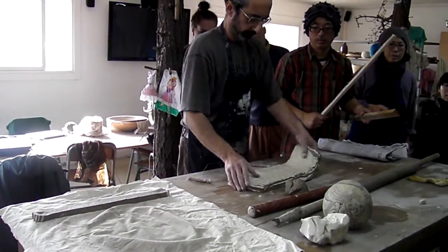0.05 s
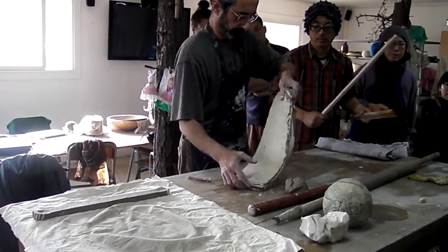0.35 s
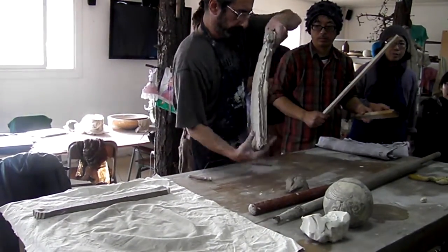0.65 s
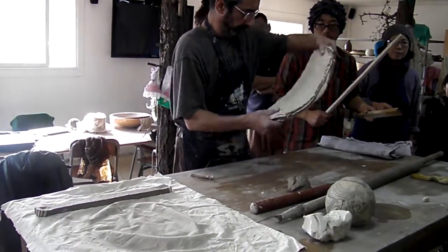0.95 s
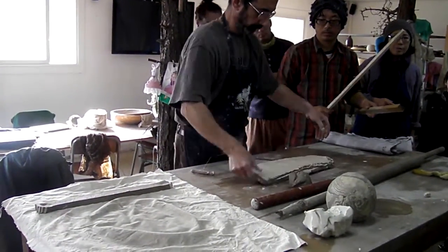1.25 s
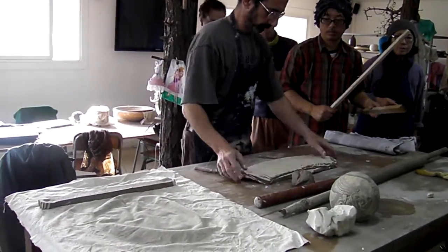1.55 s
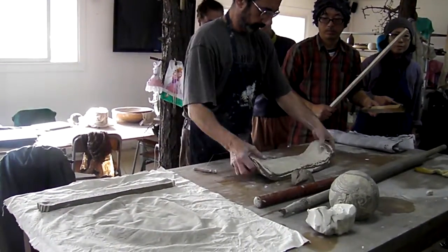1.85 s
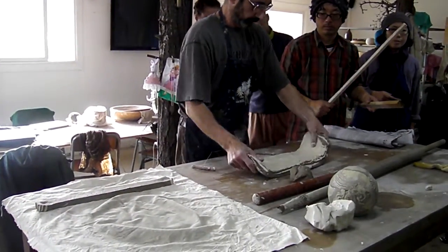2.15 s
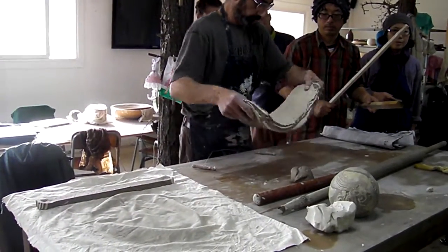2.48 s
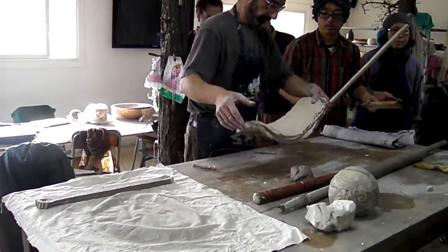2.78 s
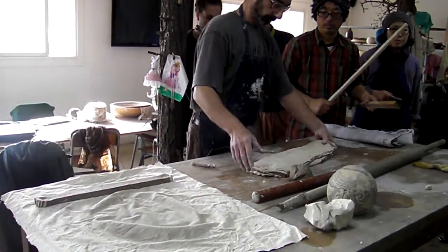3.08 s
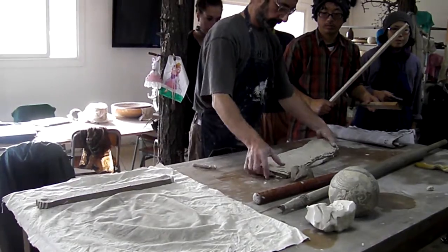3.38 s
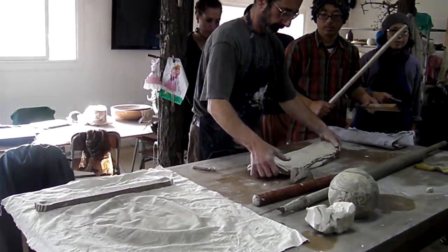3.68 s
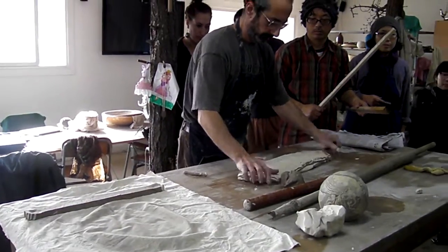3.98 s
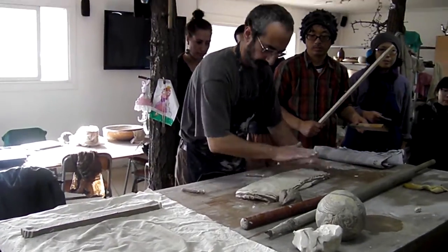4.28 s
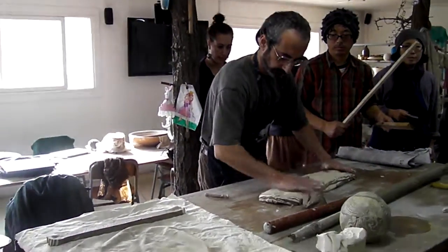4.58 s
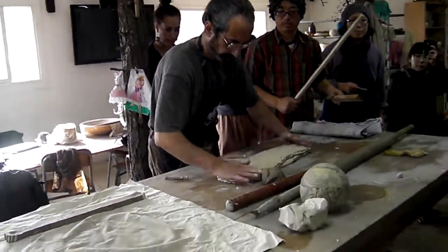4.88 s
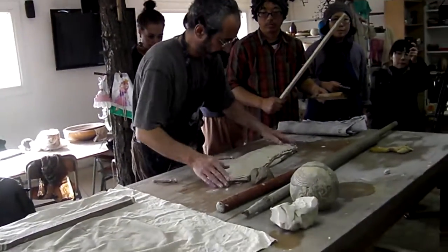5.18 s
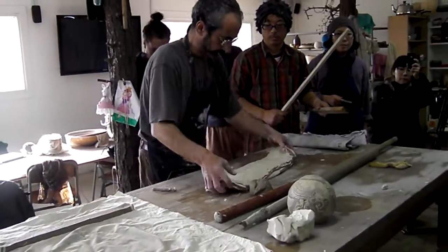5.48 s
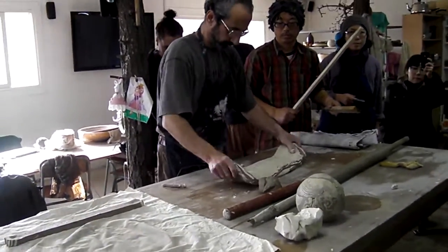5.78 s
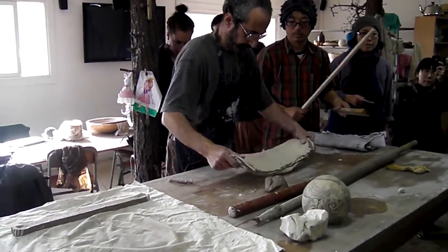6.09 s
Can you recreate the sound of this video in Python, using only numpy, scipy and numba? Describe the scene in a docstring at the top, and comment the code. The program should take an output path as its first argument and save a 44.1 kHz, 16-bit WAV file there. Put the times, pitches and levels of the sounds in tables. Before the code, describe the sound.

A slab of wet clay is peeled off a wooden table and flops back down with a double thud. After a sticky smack it lands again, heavier. Cupped hands pat and drag it, then slap it four times in quick succession, each crack ringing briefly in the bare studio. Small ticks, rubs and another wet smack follow. The microphone is fairly near, with steady faint room hiss underneath.

```python
"""Slapping clay on a worktable

A potter flops a slab of wet clay onto a wooden table, grips it and slaps it flat with both hands.
Each impact excites the table top's damped modes (a thud) and squeezes out air (a crack); a bare studio
reverberates. Friction, small ticks and a faint whine lie between the blows. The camera's limiter
holds the loud slaps down, so the room swells up behind them as the gain recovers."""
import sys
import numpy as np
from scipy import signal
from scipy.fft import rfft, irfft
from scipy.io import wavfile
from scipy.ndimage import uniform_filter1d
from numba import njit

SR = 44100
rng = np.random.default_rng(int(sys.argv[2]) if len(sys.argv) > 2 else 0)


def log_audio(samples):
    """Write samples as a 16-bit WAV file to the path given in sys.argv[1]."""
    # one column per channel
    frames = np.atleast_2d(samples).T
    # limit to full scale, then quantise
    limited = np.clip(frames, -1, 1)
    pcm = np.round(limited * 32767).astype(np.int16)
    wavfile.write(sys.argv[1], SR, pcm)


N = 275184
PULSE_SAMPLES = 4096

# Levels in the tables are relative.
# room air and microphone hiss: (frequency [Hz], spectral density [dB])
AIR_SPECTRUM = [(18, -76), (30, -49), (109, -20), (124, -13), (384, -5.5), (415, 1), (449, -6.5), (649, -8),
                (721, -10.5), (1670, -14.5), (2290, -17.5), (4300, -19.5), (6050, -21), (14000, -26),
                (16000, -28.5)]
# bands of the whine: (centre [Hz], bandwidth [Hz], level [dB])
WHINE_BANDS = [(1210, 260, 2), (2320, 140, 1), (3220, 200, -8), (4960, 550, -14)]
# swells of the whine: (time [s], level [dB], hold [s])
WHINE_SWELLS = [(1.75, -55, .01), (3.635, -48, 0.011), (4.26, -46, 0.11)]
# the studio's diffuse field: (frequency [Hz], reverberation time T60 [s], tail level [dB])
REVERBERATION = [(139, 0.51, 4.5), (270, 0.94, 8.5), (387, 0.51, 11.5), (724, 0.53, 5.5), (1340, 0.5, 2.5),
                 (2920, 0.53, -2.5), (7340, 0.42, -2.5), (14000, 0.4, -9)]
# reflections from table, body, ceiling and walls: (delay [s], gain [ratio])
REFLECTIONS = [(.0031, 0.16), (.0062, 0.22), (.0088, 0.49), (0.011, 0.15), (0.011, 0.1), (0.0208, 0.22)]
# resonances of the loaded table top: (frequency [Hz], bandwidth [Hz], gain [dB])
TABLE_MODES = [(194, 10, -2.5), (266, 20, 1.5), (345, 41, -0.5), (446, 9.7, 1), (640, 1100, -1.5)]
# the table top's weak radiation in the bass: (frequency [Hz], gain [dB])
BASS_RADIATION = [(30, -31.5), (70, -31.5), (110, -29.5), (160, -22.5), (210, -14), (270, -8)]
# clay and hands drag on the table: (peak time [s], level [dB], rise [s], fall [s])
DRAG_STROKES = [(0.492, -48.5, 0.35, .09), (2.065, -44.5, 0.048, 0.12), (3.86, -34, 0.03, 0.051),
                (4.07, -46, 0.025, 0.12), (5.305, -37.5, 0.041, 0.11), (6.0, -42.5, 0.14, 0.44)]
# small ticks: (time [s], level [dB], brightness [dB], spot resonance [Hz], spatter decay [s],
# resonance height [dB])
SMALL_TICKS = [(1.72, -1.5, 4, 2480, .003, 9), (3.324, -3.5, -5, 2390, 0.0035, 26),
               (4.036, 9.5, 8.5, 1930, .06, 3.5), (4.068, 16, -17, 1570, 0.0014, 16),
               (4.3429, -16.5, 21.5, 7560, 0.00055, 16), (4.44, 0, 2, 3000, 0.00069, 5),
               (5.5375, 10.5, -0.5, 3000, 0.0029, 7), (5.728, 16.5, -9.5, 4420, 0.0023, 17.5)]
# soft bumps of fingers and slab edges: (time [s], level [dB], brightness [dB], spot resonance [Hz])
LIGHT_TOUCHES = [(.051, -2, 2.5, 610), (.077, 4.5, 2, 423), (1.635, 2, -0.5, 3280), (1.685, 7, -4, 2580),
                 (1.826, 2.5, -1, 350), (3.476, 9, -3, 2300), (5.4887, 6, -2.5, 420)]
# pats of a cupped hand: (time [s], level [dB], brightness [dB], spot resonance [Hz], thud [dB])
CUPPED_PATS = [(3.6085, 29, -8.5, 762, -8.5), (3.8338, 34.5, 1.5, 795, -9), (5.746, 23, 8, 1047, 0)]
# the slab is gripped and pulled off the boards: (time [s], level [dB], brightness [dB],
# spot resonance [Hz], spatter decay [s], thud [dB])
WET_SMACKS = [(.104, 18, 1.5, 444, 0.013, -1.5), (1.992, 18.5, -6, 1300, 0.0023, -4),
              (2.124, 28.5, 6.5, 1070, 0.0048, -3.5), (4.096, 30.5, 1, 764, 0.0095, -1.5),
              (5.789, 33.5, -.5, 1350, 0.001, -8.5)]
# the slab lands, one part after another: (time [s], level [dB], brightness [dB], spot resonance [Hz],
# spatter decay [s], thud [dB], reverberation gain [dB])
SLAB_LANDINGS = [(1.234, 33, 2, 1060, 0.0051, 3.5, 8), (1.3653, 32.5, -1.5, 920, 0.0058, 0, 3.5),
                 (2.9686, 23.5, 11, 4300, 0.012, 22, -4.5), (2.979, 45, -0.5, 1440, 0.00051, 4, -5),
                 (3.024, 37, -7.5, 436, .0065, -7, 6.5), (3.077, 33, -5.5, 430, 0.0035, -4, 6.5)]
# two-handed slaps: (time [s], level [dB], brightness [dB], thud [dB], second hand's lag [s],
# first spot resonance [Hz], second spot resonance [Hz], resonance height [dB])
HAND_SLAPS = [(4.456, 26.5, 0.5, 6, 0.0037, 5800, 4300, 9), (4.6548, 32.5, 0, 0, 0.0035, 5120, 1950, 10),
              (4.826, 42, -5.5, -2, .004, 3900, 3760, 11), (4.9752, 39, -1.5, -1.5, 0.0065, 1110, 265, 5.5)]


def amp(db):
    """Amplitude ratio of a level in decibels."""
    return 10 ** (np.asarray(db) / 20)


def unit_rms(x):
    """Normalisation to unit mean power."""
    return x / np.sqrt(np.mean(x ** 2) + 1e-20)


def curve(points, hz, column=1):
    """Linear interpolation of a table column over log frequency."""
    columns = np.transpose(points)
    return np.interp(np.log(hz + 1), np.log(columns[0] + 1), columns[column])


def add(mix, time, sound):
    """Superposition of a sound onto the mix, starting at a time in seconds."""
    part = mix[round(time * SR):][:len(sound)]
    part += sound[:len(part)]


def resonance(hz, centre, width):
    """Lorentzian resonance curve, 1 at its centre."""
    return 1 / (1 + (2 * (hz - centre) / width) ** 2)


def minimum_phase(gain_db):
    """Minimum-phase response: the quickest causal pulse with this spectrum."""
    log_gain = np.log(amp(np.r_[gain_db, gain_db[-2:0:-1]]))
    log_spectrum = np.conj(signal.hilbert(log_gain))
    return irfft(np.exp(log_spectrum)[:len(gain_db)])


def swell(time, db, rise, hold, fall):
    """Exponential growth and decay around a hold; each slope spans 20 dB in its time."""
    t = np.arange(N) / SR - time
    return amp(db - 20 * np.maximum(np.maximum(-t / rise, (t - hold) / fall), 0))


def noise(spectrum):
    """Stationary Gaussian noise with the given spectrum, rms 1."""
    gain = amp(curve(spectrum, np.fft.rfftfreq(N, 1 / SR)))
    return unit_rms(irfft(rfft(rng.standard_normal(N)) * gain, N))


def room_air(level_db=-48):
    """The noise floor: steady broadband room air and microphone hiss."""
    return amp(level_db) * noise(AIR_SPECTRUM)


def whine(waver_db=2, waver_hz=18):
    """Amplitude modulation: narrow noise bands swell and fade together, each wavering on its own."""
    hz, out = np.fft.rfftfreq(N, 1 / SR), np.zeros(N)
    for centre, width, db in WHINE_BANDS:
        band = irfft(rfft(rng.standard_normal(N)) * amp(db) * resonance(hz, centre, width), N)
        waver = unit_rms(irfft(rfft(rng.standard_normal(N)) * (hz < waver_hz), N))
        out += band * amp(waver_db * waver)
    envelope = sum(swell(time, db, rise=0.08, hold=hold, fall=0.19) for time, db, hold in WHINE_SWELLS)
    return unit_rms(out) * envelope


def studio_tail(build_s=0.00075):
    """Reverberation: a diffuse field builds at once and decays exponentially, the treble first."""
    hz, t, bands = signal.stft(rng.standard_normal(SR), SR, nperseg=256)
    t60 = curve(REVERBERATION, hz)[:, None]
    tail_db = curve(REVERBERATION, hz, column=2)[:, None]
    unit_energy = np.sqrt(2 * np.log(1000) / (t60 * SR))
    bands = bands * amp(tail_db - 60 * t / t60) * unit_energy
    tail = signal.istft(bands, SR, nperseg=256)[1][:SR]
    return tail * (1 - np.exp(-np.arange(SR) / SR / build_s))


def early_paths(cutoff_hz=6000):
    """Multipath propagation: the direct sound and a few delayed, dulled reflections."""
    echoes = np.zeros(PULSE_SAMPLES)
    for delay, gain in REFLECTIONS:
        echoes[round(delay * SR)] += gain
    dulled = signal.lfilter(*signal.butter(1, cutoff_hz, fs=SR), echoes)
    return signal.unit_impulse(PULSE_SAMPLES) + dulled


def drags(grain_db=3, gain_db=-5):
    """Sliding friction: damp clay on the boards gives noise with a grainy amplitude."""
    strokes = sum(swell(time, db, rise, 0, fall) for time, db, rise, fall in DRAG_STROKES)
    grains = amp(grain_db * unit_rms(uniform_filter1d(rng.standard_normal(N), size=90)))
    hiss = noise([(80, -28), (300, -2), (1000, -5), (4000, -6), (8000, -14), (16000, -47)])
    rub = strokes * unit_rms(grains * hiss)
    return amp(gain_db) * (rub + signal.fftconvolve(rub, studio_tail())[:N])


def contact_force(decay_s, crossover_hz=1500):
    """Impulsive excitation: one push in the bass, a spatter in the treble as wet surfaces close."""
    t, hz = np.arange(PULSE_SAMPLES) / SR, np.fft.rfftfreq(PULSE_SAMPLES, 1 / SR)
    spatter = rng.standard_normal(PULSE_SAMPLES) * np.exp(-t / decay_s)
    treble_share = 1 / (1 + (crossover_hz / (hz + 1)) ** 4)
    push = minimum_phase(10 * np.log10(1 - treble_share))
    high_pass = minimum_phase(10 * np.log10(treble_share + 1e-6))
    return push + signal.fftconvolve(spatter / np.linalg.norm(spatter), high_pass)[:PULSE_SAMPLES]


def impact(time, db, bright_db, spot_hz, decay_s, thud_db, room_db, mid_db, crack_db, fizz_db, spot_db):
    """Source and filter: the contact force and a diffuse tail, shaped by table and spot resonances."""
    excitation = amp(room_db) * studio_tail()  # a new tail for every spot
    add(excitation, 0, signal.fftconvolve(contact_force(decay_s), early_paths()))
    hz = np.fft.rfftfreq(PULSE_SAMPLES, 1 / SR)
    mid_db += 0.69 * bright_db  # only part of the brightness reaches the mids
    crack_db += bright_db
    fizz_db += bright_db
    gain_db = curve([(300, thud_db), (720, 0), (1600, mid_db), (4200, crack_db),
                     (10500, fizz_db), (16000, fizz_db - 7.5)], hz)
    gain_db += curve(BASS_RADIATION, hz)
    gain_db += sum(height * resonance(hz, centre, width) for centre, width, height in TABLE_MODES)
    gain_db += spot_db * resonance(hz, spot_hz, width=0.28 * spot_hz)  # the struck spot is well damped
    out = np.zeros(N)
    add(out, time, signal.fftconvolve(excitation, minimum_phase(db + gain_db)))
    return out


def ticks():
    """Damped resonance: small ticks with a brief ring and little thud."""
    tone = dict(thud_db=-11, room_db=1.5, mid_db=-5, crack_db=-11.5, fizz_db=-20)
    return sum(impact(*row, spot_db=spot_db, **tone) for *row, spot_db in SMALL_TICKS)


def touches():
    """Weak modal excitation: light contacts that are mostly table thud."""
    tone = dict(thud_db=7, room_db=3.5, mid_db=-3.5, crack_db=-6, fizz_db=-29, spot_db=6.5)
    return sum(impact(*row, decay_s=0.0016, **tone) for row in LIGHT_TOUCHES)


def pats():
    """Air cushioning: a cupped hand leaves a round pop with almost no treble."""
    tone = dict(room_db=-2.5, mid_db=-14.5, crack_db=-47, fizz_db=-66, spot_db=3)
    return sum(impact(*row, decay_s=0.0005, thud_db=thud_db, **tone) for *row, thud_db in CUPPED_PATS)


def smacks():
    """Release of adhesion: damp clay parts from wood with a bright smack."""
    tone = dict(room_db=-1, mid_db=-7, crack_db=-10.5, fizz_db=-28.5, spot_db=6)
    return sum(impact(*row, **tone) for row in WET_SMACKS)


def flops():
    """Inelastic collision: the heavy slab's momentum drives the table top, and through it the room."""
    return sum(impact(*row, mid_db=-4, crack_db=-9, fizz_db=-25.5, spot_db=3) for row in SLAB_LANDINGS)


def slaps(second_hand_db=-1.5):
    """Air expulsion: two palms crack milliseconds apart, each with the hollow ring of its own spot."""
    out = np.zeros(N)
    for time, db, bright_db, thud_db, lag, first_hz, second_hz, spot_db in HAND_SLAPS:
        palm = dict(thud_db=thud_db, room_db=2, mid_db=-5.5, crack_db=-7.5, fizz_db=-14.5, spot_db=spot_db)
        out += impact(time, db, bright_db, first_hz, decay_s=0.005, **palm)
        out += impact(time + lag, db + second_hand_db, bright_db, second_hz, decay_s=0.0019, **palm)
    return out


def scene(contacts_db=-1):
    """Linear superposition of the work on the clay and the studio's quiet background."""
    contacts = flops() + slaps() + smacks() + pats() + touches() + ticks()
    return (amp(contacts_db) * contacts + drags() + whine() + room_air())[None]


@njit
def gain_reduction(excess_db, attack, recovery):
    """Envelope following: the cut in dB closes quickly on any excess and recovers at a steady rate."""
    cut, out = 0., np.zeros(len(excess_db))
    for i in range(len(excess_db)):
        if excess_db[i] > cut:
            cut += attack * (excess_db[i] - cut)
        else:
            cut = max(cut - recovery, 0.)
        out[i] = cut
    return out


def record(dry, threshold_db=-15, lag_s=0.0004, attack_s=0.0027, recovery_db_per_s=120, ceiling=0.76):
    """Limiting and saturation: the gain drops a moment late, so the first peaks overload softly."""
    x = signal.lfilter(*signal.iirnotch(7910, Q=36, fs=SR), dry[0])  # the microphone's treble dip
    excess_db = 20 * np.log10(abs(x) + 1e-9) - threshold_db
    cut_db = gain_reduction(excess_db, 1 / (attack_s * SR), recovery_db_per_s / SR)
    t = np.arange(N) / SR
    x = x * amp(-np.interp(t - lag_s, t, cut_db))
    x = ceiling * np.tanh(x / ceiling)
    x = signal.lfilter(*signal.butter(1, 85, "high", fs=SR), x)
    low_pass = signal.firwin(255, 16100, window=("kaiser", 9), fs=SR)
    return signal.oaconvolve(x, low_pass, "same")[None]


dry = scene()
out = record(dry)
log_audio(out)
```